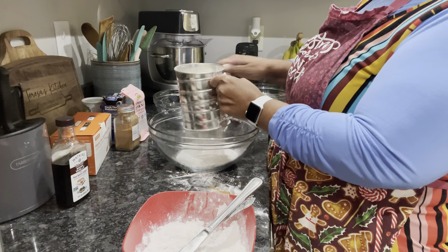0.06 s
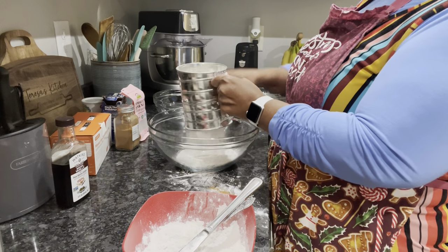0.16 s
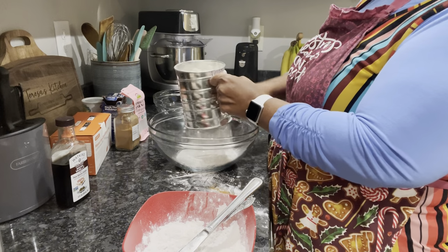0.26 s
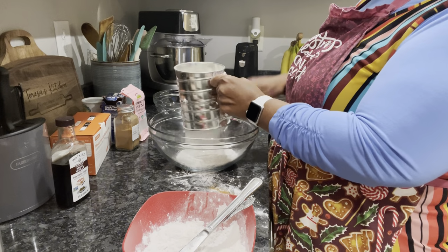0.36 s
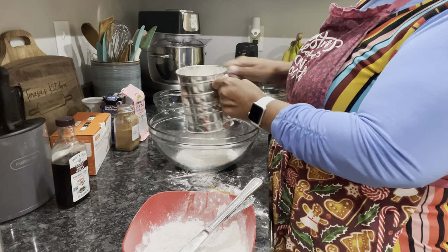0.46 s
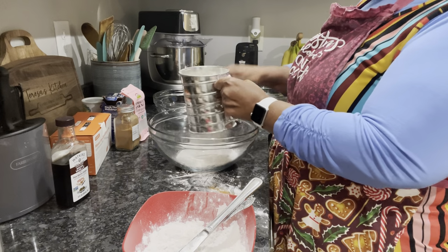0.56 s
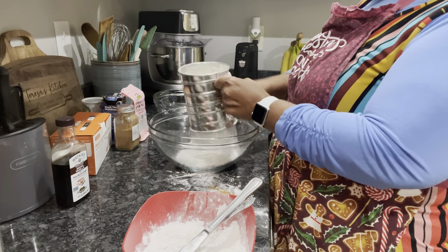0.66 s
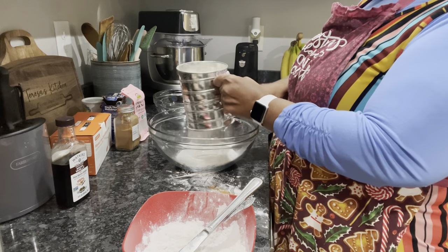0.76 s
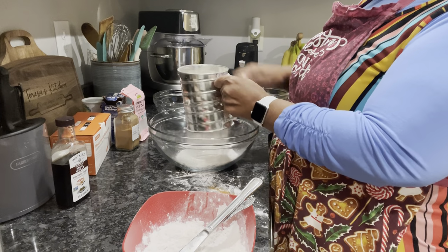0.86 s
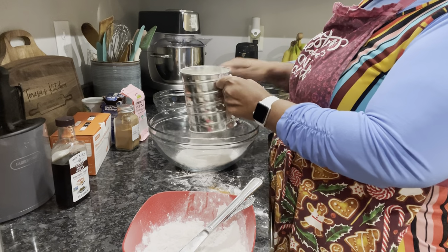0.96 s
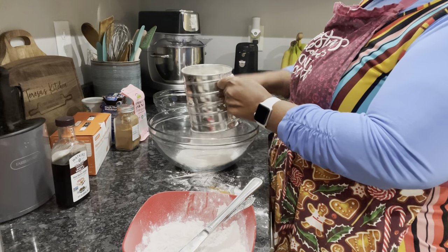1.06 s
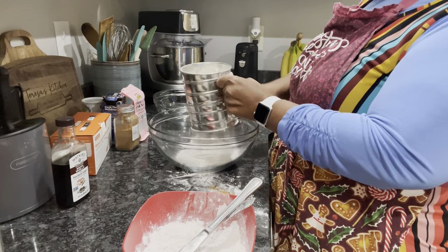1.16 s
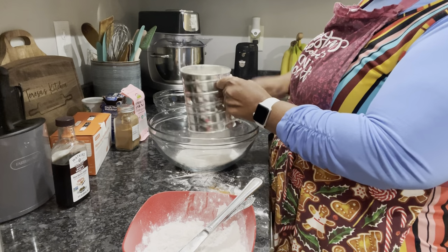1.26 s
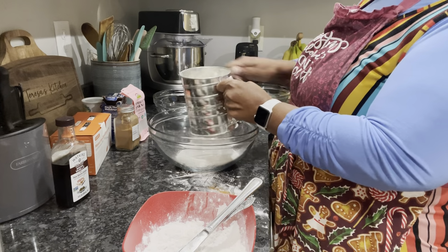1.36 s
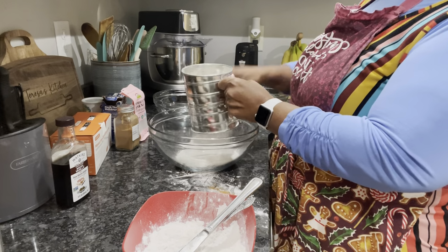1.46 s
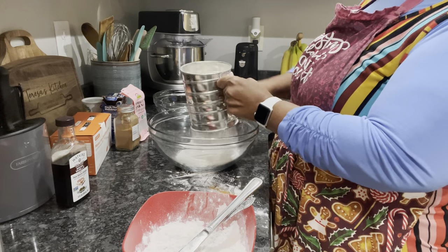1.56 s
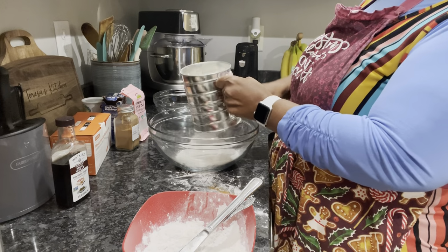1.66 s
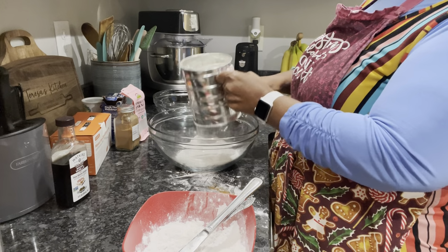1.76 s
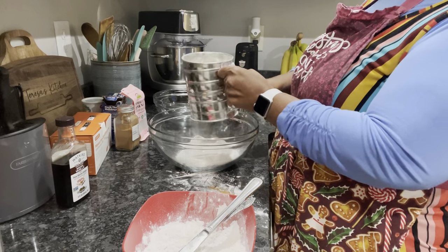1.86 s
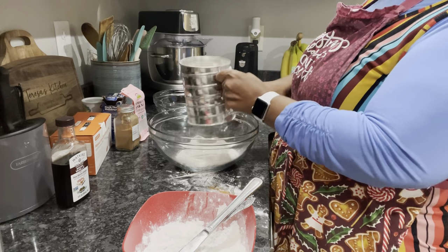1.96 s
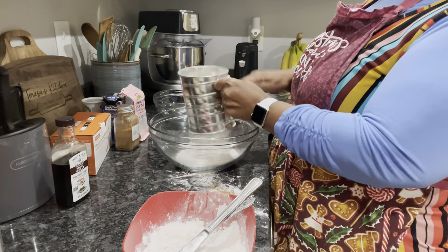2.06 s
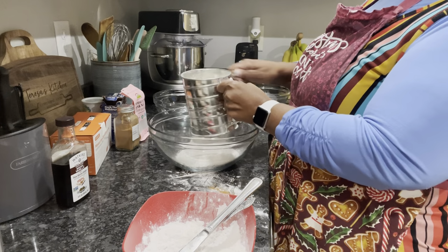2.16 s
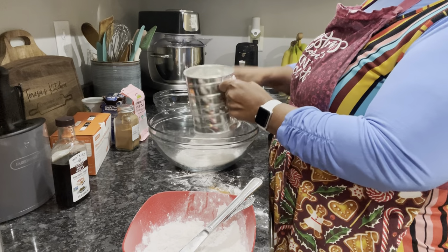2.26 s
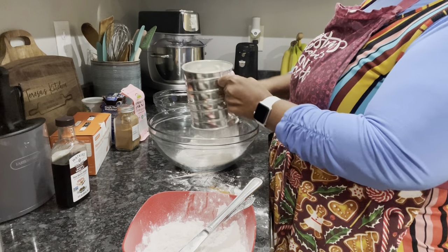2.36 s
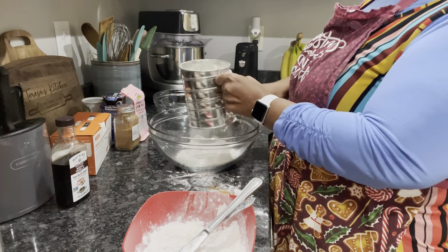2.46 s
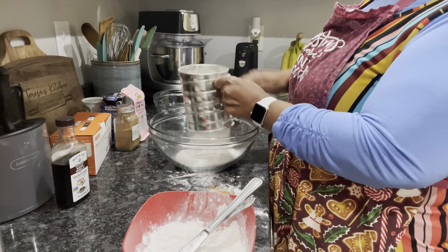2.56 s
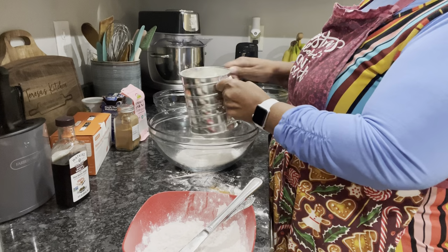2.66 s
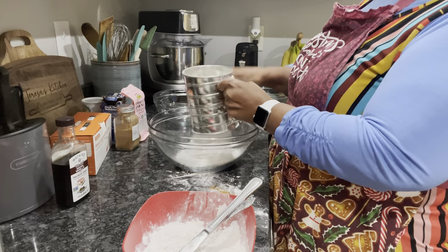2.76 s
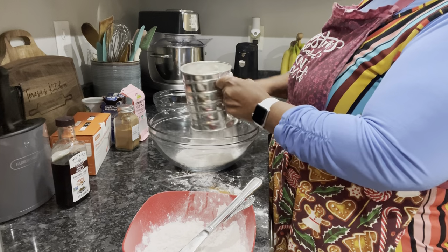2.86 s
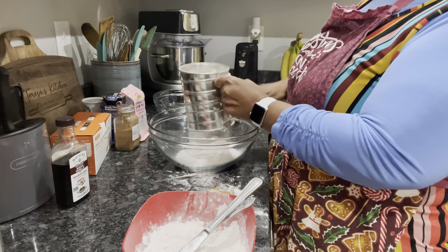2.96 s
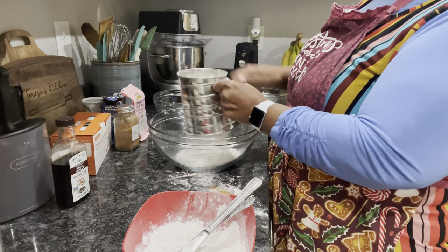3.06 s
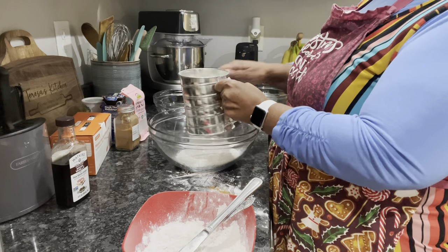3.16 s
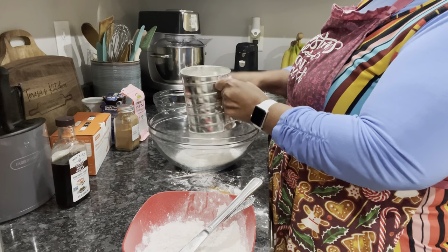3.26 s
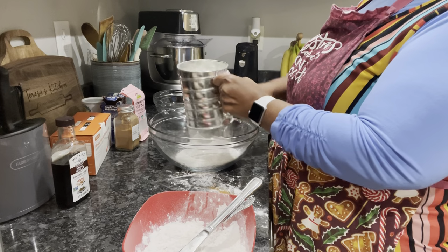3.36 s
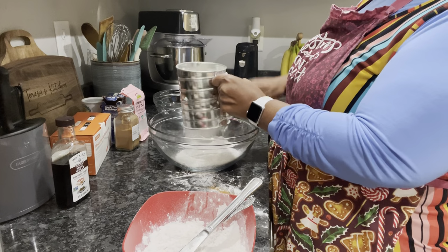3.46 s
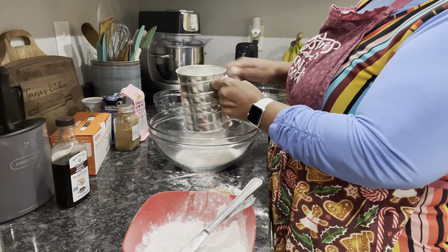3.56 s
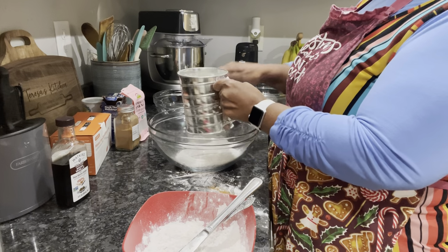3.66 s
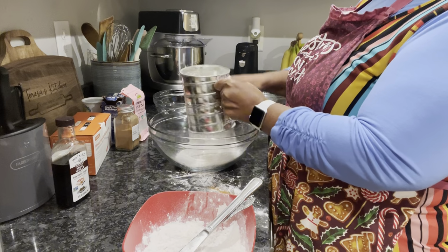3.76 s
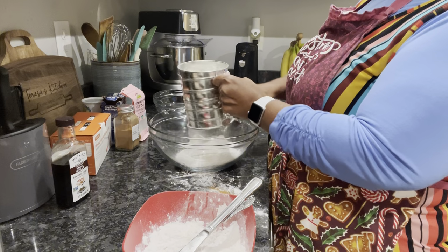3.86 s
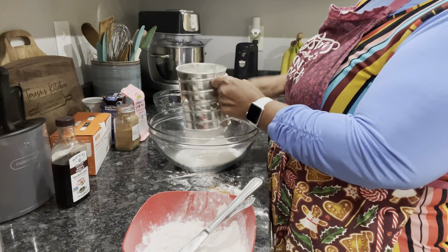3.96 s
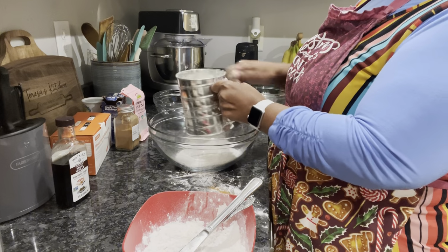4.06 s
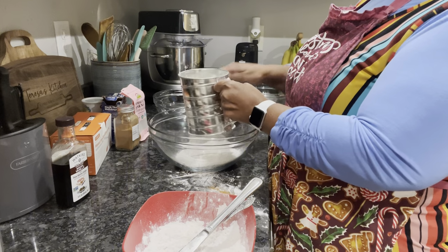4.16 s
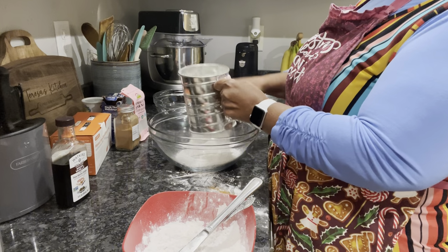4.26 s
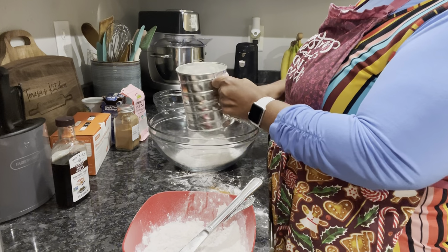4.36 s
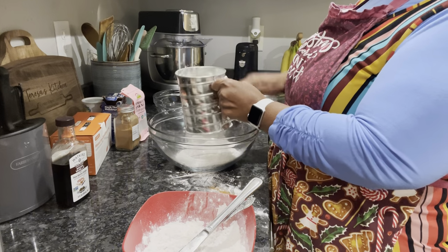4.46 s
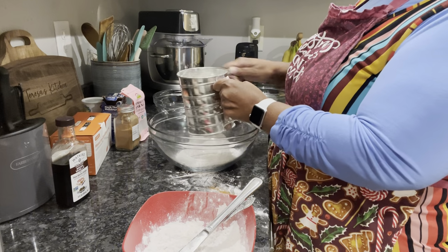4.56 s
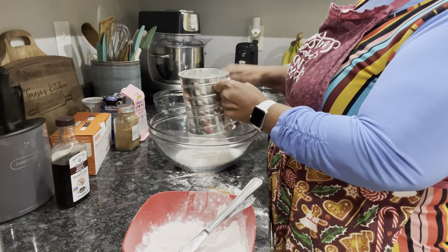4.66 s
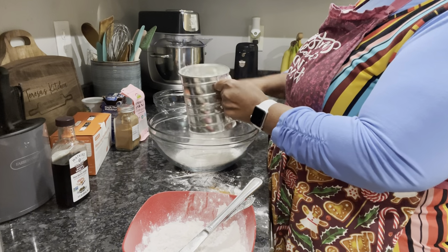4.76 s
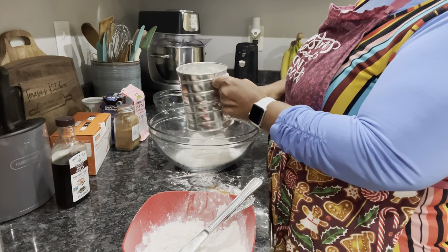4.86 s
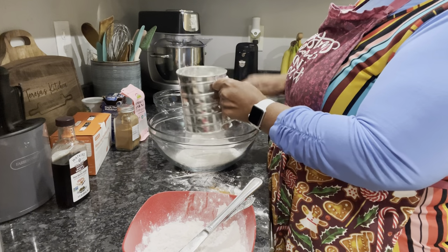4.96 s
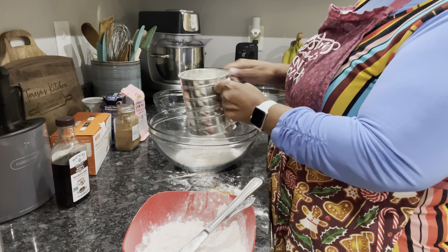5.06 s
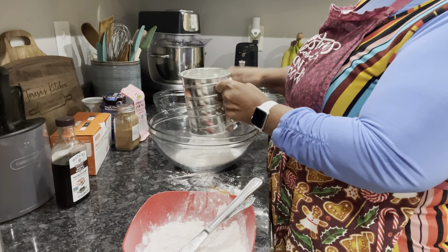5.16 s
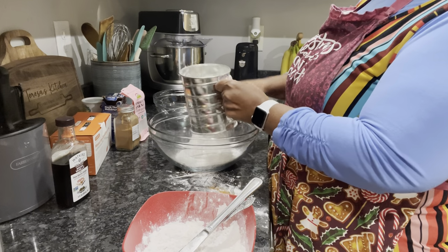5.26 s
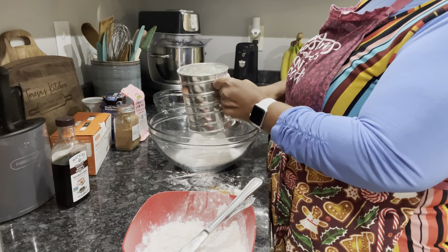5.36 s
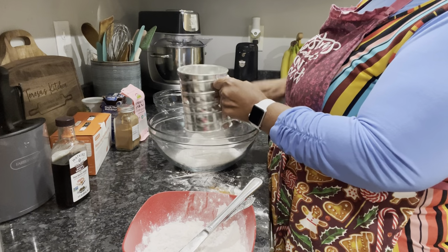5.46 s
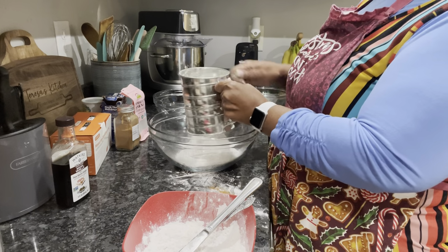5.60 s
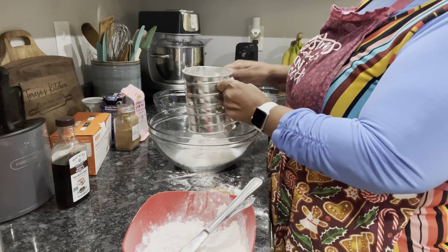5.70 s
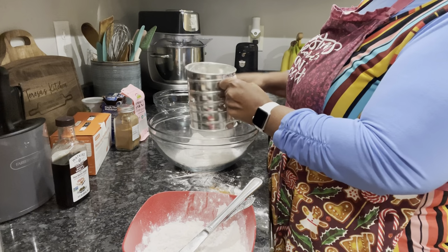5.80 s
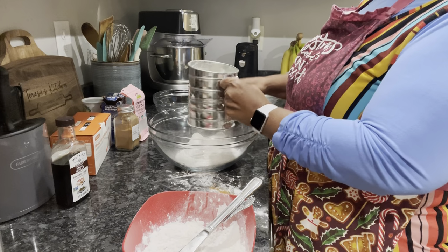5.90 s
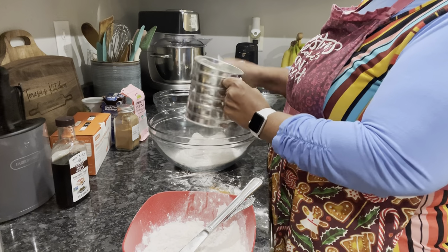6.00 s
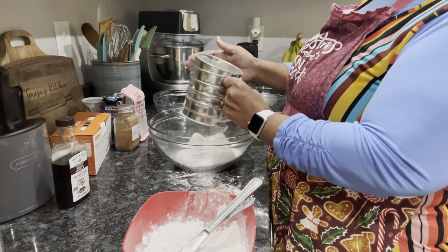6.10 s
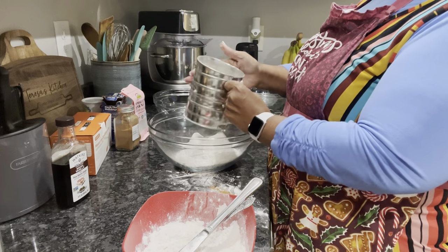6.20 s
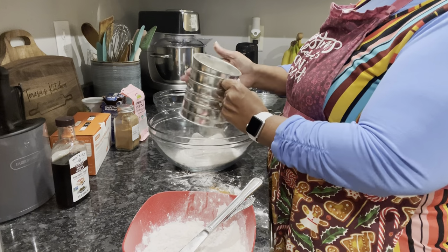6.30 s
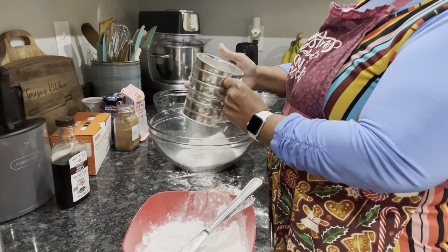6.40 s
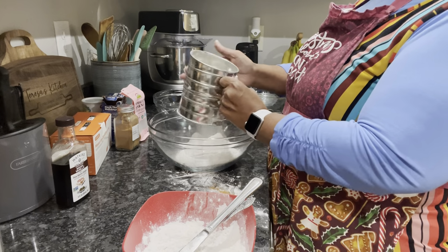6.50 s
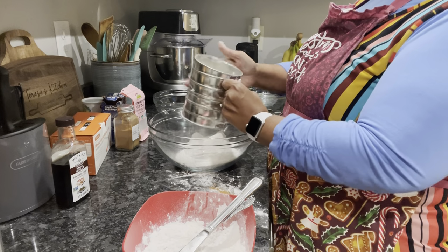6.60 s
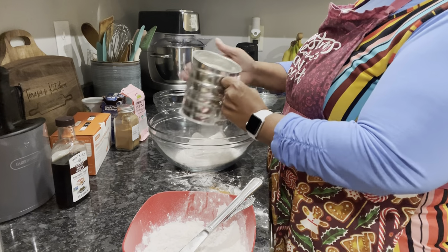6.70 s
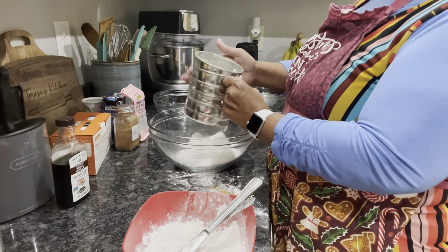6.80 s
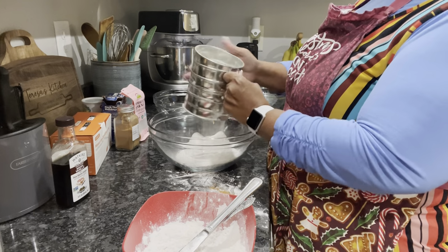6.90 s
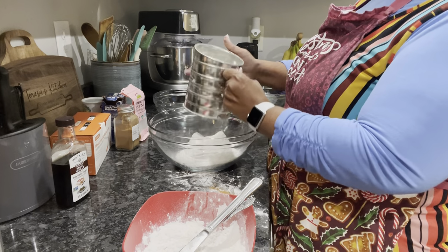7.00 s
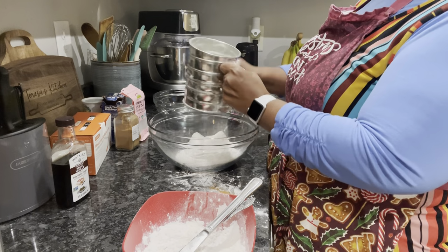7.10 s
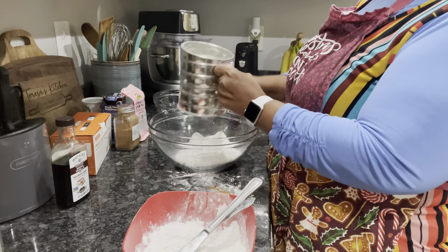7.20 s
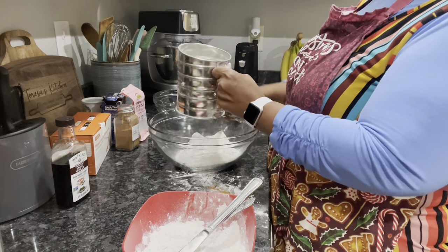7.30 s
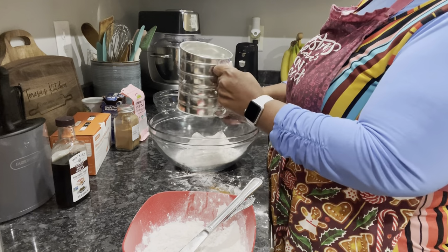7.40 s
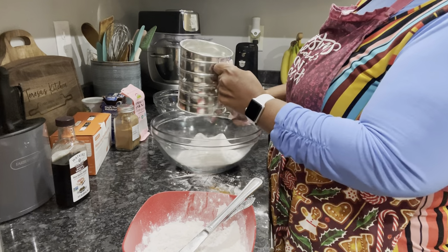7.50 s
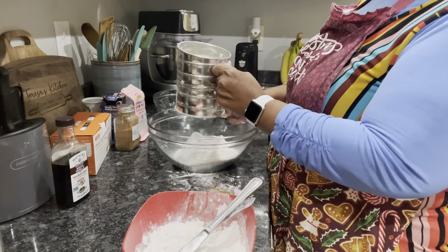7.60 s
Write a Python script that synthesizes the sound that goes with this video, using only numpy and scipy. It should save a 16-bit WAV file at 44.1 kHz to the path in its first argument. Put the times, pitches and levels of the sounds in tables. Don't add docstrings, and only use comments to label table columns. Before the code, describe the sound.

Fast scratchy half-turns of a hand sifter, snagging and ringing, give way to five rattling slaps and two muffled thuds in a quiet kitchen.

```python
import sys
import numpy as np
from scipy import signal
from scipy.fft import rfft, irfft, next_fast_len
from scipy.io import wavfile
from scipy.ndimage import uniform_filter1d

SR = 44100
rng = np.random.default_rng(int(sys.argv[2]) if len(sys.argv) > 2 else 0)


def persist_wave(psi):
    counts = np.round(np.clip(psi, -1, 1) * 32767).astype(np.int16)
    wavfile.write(sys.argv[1], SR, np.atleast_2d(counts).T)


def attenuation_scalar(level_db):
    decades = np.asarray(level_db, float) / 20
    return 10 ** decades


N = 336924

# start in seconds, drumming peak after
# seconds, drumming level in dB, scrape peak after seconds, scrape level in dB.
HALF_TURNS = [(0.0, 0.069, -32, 0.06, -41.5), (0.219, 0.076, -35, 0.078, -33.5),
              (0.43, 0.06, -32.5, 0.026, -41), (0.674, 0.049, -35, 0.058, -37),
              (0.869, 0.064, -35.5, 0.1, -36), (1.09, 0.11, -36, 0.12, -33.5),
              (1.33, 0.058, -31.5, 0.089, -34), (1.535, 0.055, -39, 0.061, -45),
              (1.937, 0.013, -40.5, 0.018, -51), (2.084, 0.13, -33, 0.16, -36),
              (2.34, 0.11, -31.5, 0.1, -30), (2.575, 0.099, -34.5, 0.15, -40.5),
              (2.855, 0.065, -37, 0.072, -38), (3.043, 0.091, -33.5, 0.14, -38),
              (3.3, 0.11, -38, 0.14, -35.5), (3.523, 0.087, -32.5, 0.1, -37.5),
              (3.78, 0.096, -39, 0.14, -35), (4.0, 0.12, -34.5, 0.093, -42),
              (4.265, 0.082, -37.5, 0.15, -36), (4.47, 0.14, -36, 0.17, -35), (4.76, 0.1, -37.5, 0.16, -35),
              (4.99, 0.1, -33, 0.13, -35.5), (5.225, 0.16, -36, 0.17, -41.5),
              (5.53, 0.17, -35.5, 0.19, -33.5)]
# time in seconds, drumming level in dB, scrape level in dB.
SHAKES = [
    (5.929, -58, -57.5),
    (6.195, -49, -52.5),
    (6.379, -50, -39.5),
    (6.567, -45, -34.5),
    (6.748, -47.5, -35.5),
    (6.939, -50.5, -36),
    (7.21, -59, -51),
]
# time in seconds, peak in dB, grit in dB.
BITES = [(.0124, -36, -11.5), (.234, -38, -12), (0.4575, -27.5, -8), (.6866, -40.5, -7.5),
         (0.8867, -39.5, -4), (1.125, -32.5, -12.5), (1.338, -33, -12), (1.554, -30.5, -12),
         (1.944, -24, -11), (2.1166, -41, -9), (2.36, -38, -8.5), (2.612, -26.5, -13.5), (2.862, -38, -9),
         (2.8744, -39.5, -6), (3.3508, -25.5, -6.5), (3.548, -31.5, -11.5), (3.7698, -30.5, -9),
         (3.9954, -28, -15.5), (4.2985, -31, -22), (4.521, -26.5, -9), (4.802, -24.5, -6),
         (5.024, -24, -8.5), (5.545, -29.5, -14)]
# time in seconds, peak in dB, dying time
# t60 in seconds, grit in dB.
SNAGS_AND_SLIPS = [(0.7182, -15.5, .037, -7.5), (0.725, -21.5, 0.03, -8), (0.9646, -20, 0.046, -10),
                   (0.9735, -21.5, 0.099, -10.5), (1.165, -21.5, .13, -8), (1.243, -20.5, 0.058, -9.5),
                   (1.9722, -22.5, 0.14, -9), (2.407, -28.5, .08, -10), (2.4202, -24, 0.11, -8),
                   (2.43, -18.5, .04, -4.5), (2.4622, -19, 0.13, -5.5), (2.479, -14.5, 0.09, -8.5),
                   (2.493, -22, 0.1, -9), (2.7031, -16, .066, -10.5), (2.9545, -22, 0.045, -8.5),
                   (2.9585, -16.5, 0.087, -8), (3.673, -12.5, .039, -10), (3.832, -23, 0.091, -8),
                   (4.141, -21, .18, -6.5), (4.829, -20.5, .042, -11.5), (5.1115, -22, .1, -8.5),
                   (5.17, -28, .05, -12), (5.3857, -16, .042, -7.5), (5.425, -15.5, 0.088, -9),
                   (5.435, -21.5, .11, -6.5), (5.69, -24.5, 0.12, -6.5), (5.72, -25, 0.15, -8.5),
                   (.058, -26.5, 0.071, -5.5), (0.0884, -25, 0.18, -9), (.18, -42, .05, -16), (.276, -22, .062, -8),
         (.521, -24.5, 0.18, -10), (.769, -24, 0.11, -5.5), (.831, -25, 0.052, -10.5),
         (1.01, -23.5, 0.056, -10), (1.379, -34.5, .09, -7), (1.3907, -28, .1, -6.5),
         (1.417, -31.5, .12, -5.5), (1.452, -29, 0.057, -9.5), (2.223, -37, .1, -8),
         (2.243, -28, .1, -10.5), (2.563, -30.5, .04, -13), (3.0, -33, 0.044, -10.5),
         (3.0635, -28, .035, -15), (3.222, -31.5, .06, -8.5), (3.122, -31.5, .08, -8),
         (3.169, -22, 0.039, -7.5), (3.4235, -27.5, 0.1, -7), (3.445, -23.5, 0.049, -10),
         (3.6302, -19.5, 0.058, -10.5), (4.049, -40, .06, -7), (4.069, -37, .06, -7),
         (4.568, -31.5, .07, -6), (4.6204, -30, 0.083, -3.5), (4.8518, -22.5, .09, -8),
         (4.8913, -23, 0.12, -10), (5.647, -32.5, .07, -6.5)]
# time in seconds, peak in dB, t60 in seconds, grit in dB.
RATTLES = [(6.1852, -22, .07, -6.5), (6.1953, -19.5, 0.14, -11.5), (6.229, -25, .13, -9.5),
           (6.3747, -22, .06, -3), (6.3841, -16.5, 0.042, -5.5), (6.421, -18, 0.051, -4),
           (6.507, -30.5, .08, -14), (6.5555, -18.5, .04, -7.5), (6.563, -15, 0.083, -6.5),
           (6.595, -24.5, 0.061, -5), (6.6718, -33, 0.17, -12.5), (6.766, -22, .1, -7),
           (6.8833, -27.5, .051, -6), (6.987, -25, .077, -9)]
# time in seconds, peak in dB, t60 in seconds, grit in dB.
CRACKS = [(1.5652, -19.5, 0.04, -1), (3.8701, -22.5, .1, -6), (3.888, -23, 0.092, -7),
          (4.308, -16, .03, -1), (4.3142, -19, .03, -2), (4.316, -17.5, 0.03, 4.4),
          (5.2993, -23, 0.05, -0.5), (6.7346, -13, .03, -6)]
# time in seconds, peak in dB, t60
# in seconds, grit in dB.
TICKS = [(.388, -32.5, .08, -16), (5.8683, -31, .043, -9), (5.9238, -26.5, .064, -16),
         (6.0097, -47.5, .1, -18), (6.9194, -12, .04, -10), (6.929, -16.5, .05, -12),
         (6.939, -17.5, 0.035, -10), (7.191, -29.5, .11, -14), (7.201, -22, .049, -11.5),
         (7.222, -34, .083, -14)]
# frequency in Hz, width in Hz, level in dB.
CUP_MODES = [(1394, 28, 8.5), (1616, 63, 3), (1845, 42, -1), (1864, 90, 12), (2124, 59, 4.5),
             (2194, 47, -3.5), (2880, 53, 8), (2990, 84, 10.5), (3180, 440, 0), (3760, 160, -5.5),
             (4210, 27, 0.5), (4520, 52, -3.5), (5640, 78, -14.5), (7090, 226, 12.5)]
# frequency in Hz, width in Hz, level in dB.
TIPPED_CUP_MODES = [(1680, 40, -3.5), (1934, 150, 13.5), (2570, 60, -10.5), (3150, 480, -3), (3820, 60, -6),
                    (4050, 60, 13.5), (4710, 130, 10), (5540, 330, 6), (6674, 390, 10.5)]
# frequency in Hz, width in Hz, level in dB.
RIM_MODES = [(1900, 22, -4), (2175, 22, -7), (2975, 16, -1), (3290, 15, -4), (3770, 20, -6), (4345, 9, 4),
             (4760, 20, -4), (6530, 28, -6), (10285, 28, -8)]
# frequency in Hz, width in Hz, level in dB.
FREE_RIM_MODES = [(2040, 12, -9), (2172, 13, -8), (2880, 15, -7), (3275, 9, -3), (3720, 12, -4),
                  (4165, 8, -5), (4350, 7, -2), (4755, 12, -2), (6545, 9, -2), (8060, 10, -2),
                  (9600, 16, -1), (10290, 14, 1), (11450, 18, -8), (12090, 20, -4)]
# frequency in Hz, level in dB.
RASP = [(300, -46), (900, -2), (1250, -10.5), (1700, 4), (2400, -5), (3500, 0), (5000, 4.5), (7000, 1.5),
        (9000, 6.5), (13000, -41.5)]
# frequency in Hz, level in dB.
SCRAPE_GRIT = [(4000, -26.5), (7500, 1), (9000, 8), (11000, -5), (13000, -9), (14000, -12.5),
               (15500, -13.5), (16200, -38), (17000, -63.5)]
# frequency in Hz, level in dB.
CATCH_GRIT = [(3000, -22.5), (5000, 2), (7500, -2), (9500, 4), (11000, 1), (12800, -1), (14500, -6),
              (16200, -29.5)]
# frequency in Hz, level in dB.
SNAP = [(800, -22.5), (2000, -10.5), (6000, -4), (12000, 1), (16000, -2)]
# frequency in Hz, width in Hz, level in dB.
MESH_MODES = [(206.6, 23.6, -3), (320.6, 50, -7), (477, 56, -15), (609, 68, 0), (754, 28, -3.5),
              (812, 39, 1), (1031, 5.7, 4)]
# frequency in Hz, level in dB.
THRUM = [(90, -40), (170, -8.5), (350, -2.5), (700, 4), (1000, -16), (1400, 1), (2500, -21.5)]
PATCH_HZ = [586, 449, 560, 450, 500, 560, 520, 400, 600, 540, 200, 382, 331, 400, 400, 350, 350, 340, 340,
            340, 380, 350, 340, 360]
# time in seconds, peak in dB, depth factor on the wall modes,
# bounce gap in seconds, boom in dB.
SLAPS = [
    (1.943, -34, 0.81, 0.0061, -3.5),
    (6.186, -26, 0.93, 0.0029, -3),
    (6.374, -25.5, 0.9, 0.0048, -2.5),
    (6.556, -20.5, 0.94, 0.004, -7.5),
    (6.735, -25, 0.92, 0.0045, -2.5),
    (6.92, -25.5, 0.9, 0.0044, 2.5),
]
# frequency in Hz, width in Hz, level in dB.
WALL_MODES = [(116, 73, -4), (284, 62, 1), (630, 140, 3), (830, 85, -5), (1202, 240, -7), (2000, 60, -8.5)]
# time in seconds, peak in dB, tick in dB.
KNOCKS = [
    (7.349, -30.5, -36.5),
    (7.3604, -27.5, -39.5),
    (7.367, -37.5, -36.5),
    (7.385, -41.5, -34),
    (7.5082, -24.5, -24.5),
    (7.52, -23, -25.5),
    (7.533, -27, -23.5),
    (7.552, -33.5, -17),
]
# frequency in Hz, width in Hz, level in dB.
PANEL_MODES = [(80, 9, -4), (120, 9, -2), (200, 30, -4), (450, 14, -5), (510, 25, -5), (575, 35, 2),
               (670, 40, 1), (745, 30, 0), (870, 40, -3), (1045, 7, 0), (1140, 40, -14), (1400, 300, -20),
               (1835, 40, -8), (2200, 200, -10)]
# frequency in Hz, t60 in seconds.
KITCHEN_T60 = [(150, 0.28), (500, 0.03), (1400, 0.34), (3700, 0.37), (9700, 0.23), (15000, 0.14)]
# frequency in Hz, level in dB per Hz.
HUSH = [(18, -32), (30, -28.5), (64, -2), (93, -11), (221, -5), (437, -19), (473, -31.5), (569, -8),
        (1760, -35), (4300, -34), (16000, -46.5)]
# frequency in Hz, width in Hz, level in dB.
FRIDGE_MODES = [(63, 12, -18), (130.7, 11, -13.5)]
# frequency in Hz, likeness 0-1, lead of the right in radians,
# left over right in dB.
PORTS = [(60, .94, 0, 3.5), (150, .92, 0, 4.4), (300, .86, 0, 5), (700, .6, .8, 1.5), (1050, .35, -.6, -.5),
         (1900, .6, -.6, .5), (2300, .7, .5, 1.5), (3300, .45, 1.6, 1.5), (4200, .25, 1.2, 1),
         (5400, .55, 2.7, .5), (6200, .3, 2.4, 0), (7300, .86, 2.95, 0), (8050, .88, 2.9, 0),
         (8700, .7, 2.1, -.5), (10000, .8, .7, -.4), (11000, .95, .2, 0), (14000, .88, -.3, 0)]

TIP_S, CARRY_S, CARRY_DB = 5.82, 7.44, -73.5
DRUM_LIFT_DB, SCRAPE_LIFT_DB = -59, -62.5
PAUSE_S, DRUM_STOP_S, SCRAPE_STOP_S = 0.33, 0.097, 0.12
SHAKE_RISE, DRUM_SETTLE, SCRAPE_SETTLE = 530, 79, 160


def hoop():
    t = np.arange(N) / SR
    peak_after, peak_db = np.transpose(HALF_TURNS)[3:]
    shake_db = np.transpose(SHAKES)[2]
    scrape_db = pressure(peak_after, peak_db, SCRAPE_LIFT_DB, SCRAPE_STOP_S, shake_db, SCRAPE_SETTLE)
    judder = attenuation_scalar(1.16 * drift(90))
    scrape = (attenuation_scalar(scrape_db - 3.0) * judder) ** 2
    fine = scrape * attenuation_scalar(0.1 * (scrape_db + 54.0)) ** 2
    slips, strikes, sparks = catch_signals()

    contact = grains(2.1) * attenuation_scalar(0.43 * drift(500))
    force = contact * np.sqrt(scrape + slips)
    slip_force = contact * np.sqrt(slips)

    tin = ring(force * (t < TIP_S), CUP_MODES, wander_db=1.5)
    tip = round(TIP_S * SR)
    tipped = ring(force[tip:], TIPPED_CUP_MODES)
    free_rim = ring((slip_force + attenuation_scalar(19) * strikes)[tip:], FREE_RIM_MODES)
    add(tin, TIP_S, tipped + attenuation_scalar(-3.5) * free_rim)

    freed = attenuation_scalar(np.where(t < TIP_S, -3, -6))
    rim = ring(contact * freed * np.sqrt(slips + 0.3 * scrape), RIM_MODES, wander_db=2)
    touch = attenuation_scalar(14) * ring(strikes * freed, RIM_MODES, wander_db=2.5)
    touch += attenuation_scalar(-6.5) * coloured(strikes, SNAP)
    grit = coloured(contact * np.sqrt(fine), SCRAPE_GRIT)
    grit += coloured(contact * np.sqrt(sparks), CATCH_GRIT)
    rasp = coloured(force, RASP)
    return attenuation_scalar(5.0) * rasp + attenuation_scalar(-2.0) * tin + attenuation_scalar(-4.5) * rim + attenuation_scalar(1.5) * grit + touch


def catch_signals():
    slips, strikes, sparks = np.zeros((3, N))
    for at, db, t60, grit_db in catches():
        length = 0.0024 + 0.00029 * max(db + 24.5, 0)
        slip = (attenuation_scalar(db - 11.5) * burst(length, t60)) ** 2
        add(slips, at, slip)
        add(strikes, at, attenuation_scalar(db + grit_db) * np.ones(1))
        add(sparks, at, slip * attenuation_scalar(grit_db + 9.5) ** 2)
    return slips, strikes, sparks


def catches():
    bite_t60 = 0.14
    bites = [(at, db, bite_t60, grit_db) for at, db, grit_db in BITES]
    return bites + SNAGS_AND_SLIPS + RATTLES + CRACKS + TICKS


def pressure(after, peak_db, lift_db, stop_s, shake_db, settle):
    t = np.arange(0, N / SR + 0.01, 0.002)
    start = np.transpose(HALF_TURNS)[0]
    gap = np.diff(start, append=N / SR)
    rise = np.clip(after, 0.01, None)
    fall = np.where(gap > PAUSE_S, stop_s, np.clip(gap - rise, 0.02, None))
    late = t[:, None] - start - rise
    sweeps = peak_db - (peak_db - lift_db) * np.maximum(-late / rise, late / fall)
    sweeps -= SHAKE_RISE * np.maximum(-late - rise, 0)
    late = t[:, None] - np.transpose(SHAKES)[0]
    shakes = shake_db - np.maximum(-late * SHAKE_RISE, late * settle)
    rustle = np.interp(t - CARRY_S, [-0.06, 0], [-90, CARRY_DB])
    loudest = np.maximum(np.hstack([sweeps, shakes]).max(axis=1), rustle)
    return np.interp(np.arange(N) / SR, t, loudest)


def mesh():
    peak_after, peak_db = np.transpose(HALF_TURNS)[1:3]
    shake_db = np.transpose(SHAKES)[1]
    load_db = pressure(peak_after, peak_db, DRUM_LIFT_DB, DRUM_STOP_S, shake_db, DRUM_SETTLE)
    lumps = attenuation_scalar(load_db + 0.63 * drift(70))
    drag = grains(2.0) * lumps
    later = np.roll(drag, round(0.02 * SR))
    low = ring(drag, MESH_MODES[:3], wander_db=3.5)
    high = ring(later, MESH_MODES[3:], wander_db=2.0)
    thrum = coloured(drag, THRUM)
    return attenuation_scalar(-11.5) * patch(drag) + attenuation_scalar(-12.0) * low + attenuation_scalar(-8.5) * high + attenuation_scalar(-9.5) * thrum


def patch(drag):
    climb, width_hz = 2.45, 108
    t = np.arange(N) / SR
    start, after = np.transpose(HALF_TURNS)[:2]
    turn = np.clip(np.searchsorted(start, t, "right") - 1, 0, None)
    from_peak = np.clip(t - (start + after)[turn], -0.12, 0.12)
    hz = np.array(PATCH_HZ)[turn] * 2 ** (climb * from_peak)
    spin = np.exp(2j * np.pi * np.cumsum(hz) / SR)
    r = np.exp(-np.pi * width_hz / SR)
    return 2 * np.sqrt(1 - r) * (spin * signal.lfilter([1], [1, -r], drag / spin)).real


def slaps():
    out, t = np.zeros(N), np.arange(SR // 4) / SR
    push = np.hanning(round(0.00042 * SR))
    for at, db, depth, gap, boom_db in SLAPS:
        fingers = landing(gap, count=3, fade_db=-2)
        thump = ring(np.convolve(fingers, push), WALL_MODES, factor=depth)[:len(t)]
        hz = depth * (85 + 520 * np.exp(-t / 0.00608))
        swell = attenuation_scalar(-60 * t / 0.074) * np.minimum(t / 0.0057, 1)
        boom = np.sin(2 * np.pi * np.cumsum(hz) / SR) * swell
        add(out, at, attenuation_scalar(db) * (attenuation_scalar(-1) * thump / abs(thump).max() + attenuation_scalar(boom_db) * boom))
    return out


def landing(gap, count, fade_db):
    out = np.zeros(SR // 4)
    jitter, size = rng.uniform(0.7, 1.9, (2, count))
    at = (np.cumsum(jitter) - jitter[0]) * abs(gap)
    out[(at * SR).astype(int)] = size * attenuation_scalar(fade_db * np.arange(count))
    return out


def knocks():
    out, t = np.zeros(N), np.arange(SR // 3) / SR
    muffle = signal.butter(10, 1130, fs=SR, output="sos")
    for at, db, tick_db in KNOCKS:
        way = attenuation_scalar(-43 - 60 * t / 0.45) * rng.standard_normal(len(t)) + (t == 0)
        thud = ring(way, PANEL_MODES)
        thud = signal.sosfilt(muffle, thud) + attenuation_scalar(tick_db) * thud
        add(out, at, attenuation_scalar(db) * thud / abs(thud).max())
    return out


def kitchen(x, wet_db):
    out = x.copy()
    turn = np.cumsum(2 * np.pi * (1.28 + 0.43 * drift(1.9))) / SR
    for k in range(3):
        taps = np.zeros(SR // 2)
        at = np.arange(200, SR // 2 - 20, 20)
        taps[at + rng.integers(0, 20, len(at))] = rng.choice([-1., 1.], len(at))
        hz, t, z = signal.stft(taps, SR, nperseg=256)
        t60 = read(*np.transpose(KITCHEN_T60), hz)[:, None]
        tail = signal.istft(z * attenuation_scalar(-60 * t / t60), SR, nperseg=256)[1]
        share = np.sqrt((1 + np.cos(turn + 2 * np.pi * k / 3)) / 3)
        out += attenuation_scalar(wet_db) * signal.oaconvolve(x * share, tail / np.linalg.norm(tail))[:N]
    return out


def scattered(x):
    z = signal.stft(x, nperseg=256, noverlap=192)[2]
    wander = rng.standard_normal((2, *z.shape))
    a, b = uniform_filter1d(uniform_filter1d(wander, size=2, axis=1), size=8, axis=2)
    y = signal.istft(z * np.exp(1j * np.arctan2(a, b)), nperseg=256, noverlap=192)[1][:N]
    return evened(y) * np.std(x)


def hush():
    return attenuation_scalar(-67) * coloured(rng.standard_normal(N), HUSH)


def fridge():
    return attenuation_scalar(-68.0) * evened(ring(rng.standard_normal(N), FRIDGE_MODES))


def ring(x, modes, wander_db=0, factor=1):
    out, power = np.zeros(len(x)), 0
    for k, (hz, width, db) in enumerate(modes):
        r = np.exp(-np.pi * width / SR)
        angle = 2 * np.pi * hz * factor / SR
        drive = x * attenuation_scalar(wander_db * drift(22)) if wander_db else x
        mode = signal.lfilter([1], [1, -2 * r * np.cos(angle), r * r], drive)
        out += (-1) ** k * attenuation_scalar(db) * 2 * (1 - r) * np.sin(angle) * mode
        power += attenuation_scalar(db) ** 2 * (1 - r)
    return out / np.sqrt(power)


def grains(spread_db, size=N):
    boost_db = spread_db * np.minimum(rng.exponential(1, size), 5)
    return evened(rng.standard_normal(size) * attenuation_scalar(boost_db))


def burst(length, t60, rise=0.0022):
    t = np.arange(round(0.3 * SR)) / SR
    dying = attenuation_scalar(-60 * np.maximum(t - abs(length), 0) / abs(t60))
    return np.minimum(t / max(rise, 2e-4), 1) * dying


def coloured(x, points):
    hz = np.abs(np.fft.fftfreq(4096, 1 / SR))
    log_gain = np.log(attenuation_scalar(read(*np.transpose(points), hz)))
    taps = np.fft.ifft(np.exp(np.conj(signal.hilbert(log_gain)))).real[:2048]
    return signal.oaconvolve(x, taps / np.linalg.norm(taps))[:len(x)]


def drift(per_s):
    steps = rng.standard_normal(N // 64 + 2)
    span = max(round(SR / 64 / per_s), 1)
    smooth = evened(uniform_filter1d(uniform_filter1d(steps, span), span))
    return np.interp(np.arange(N) / 64, np.arange(len(steps)), smooth)


def evened(x):
    return x / np.sqrt(np.mean(x ** 2) + 1e-20)


def read(hz_points, values, hz):
    return np.interp(np.log(hz + 1), np.log(np.asarray(hz_points) + 1), values)


def add(mix, s, sound):
    part = mix[round(s * SR):][:len(sound)]
    part += sound[:len(part)]


def scene():
    sifter = hoop() + mesh() + slaps()
    far = knocks()
    near = kitchen(sifter + attenuation_scalar(1) * far, wet_db=-9.5)
    near += attenuation_scalar(-11.5) * far + hush() + fridge()
    return np.array([near, scattered(near)])


def top_cut(x):
    return signal.sosfilt(signal.butter(12, 16640, fs=SR, output="sos"), x)


def record(dry):
    size = next_fast_len(N)
    hz = np.fft.rfftfreq(size, 1 / SR)
    left, other = rfft(dry, size)
    at, *columns = np.transpose(PORTS)
    like, lead, balance_db = (read(at, c, hz) for c in columns)
    like = np.clip(like, 0, 1)
    right = like * left * np.exp(1j * lead) + np.sqrt(1 - like ** 2) * other
    band_hz = [15, 35, 55, 13200, 15600, 16300, 16600]
    band = attenuation_scalar(read(band_hz, [-40.5, -16, 4.5, -2.5, -6.5, -17.0, -48.5], hz))
    tilt = attenuation_scalar(balance_db / 2)
    pair = irfft(band * np.array([left * tilt, right / tilt]), size)[:, :N]
    return top_cut(pair)


dry = scene()
out = record(dry)
persist_wave(out)
```